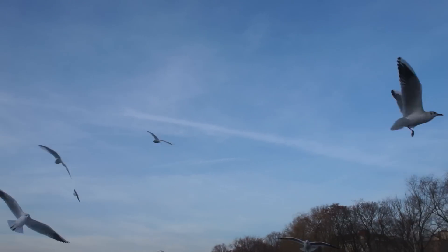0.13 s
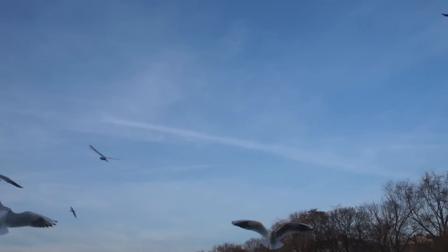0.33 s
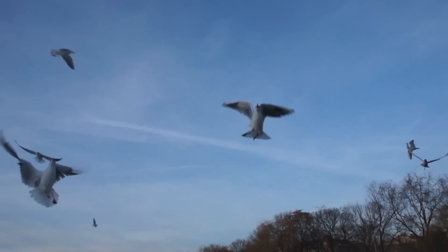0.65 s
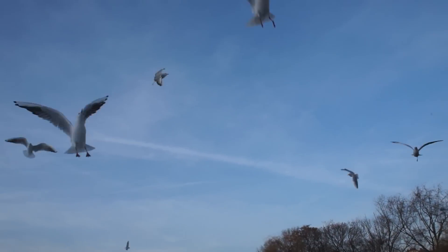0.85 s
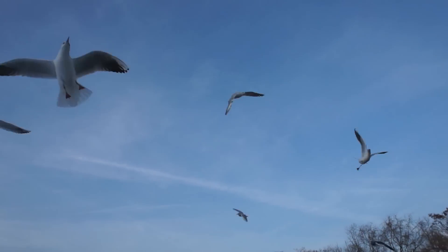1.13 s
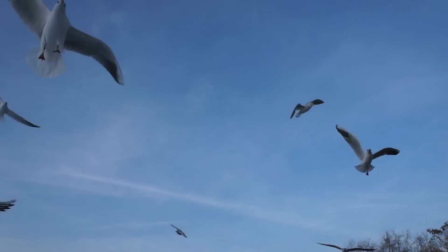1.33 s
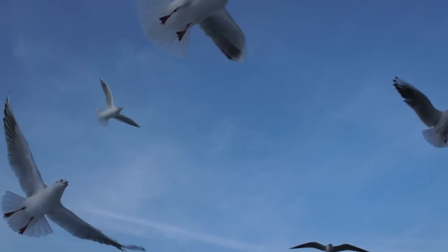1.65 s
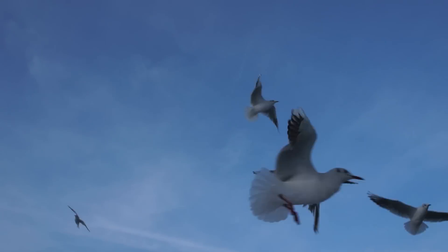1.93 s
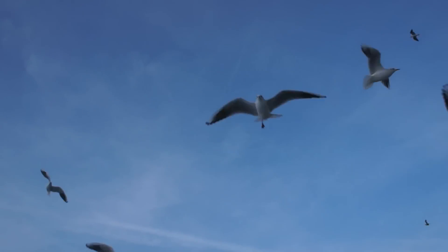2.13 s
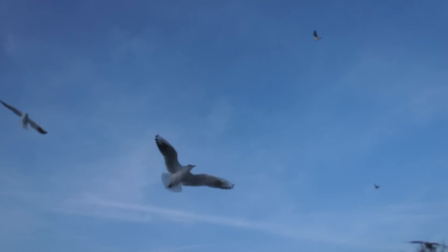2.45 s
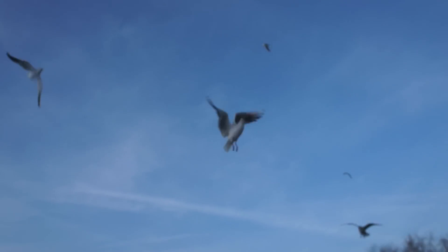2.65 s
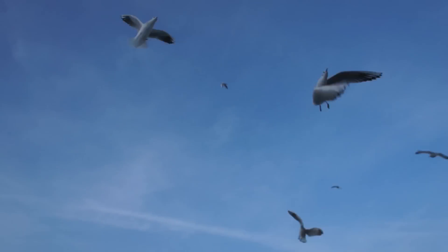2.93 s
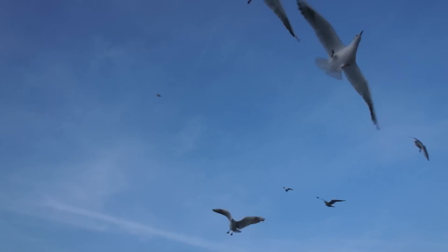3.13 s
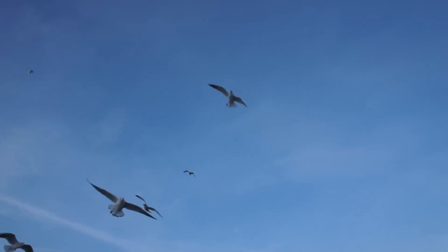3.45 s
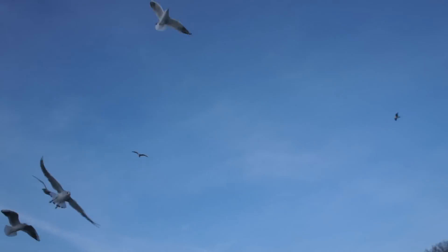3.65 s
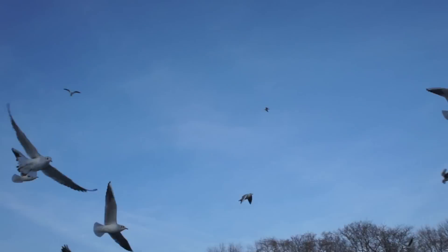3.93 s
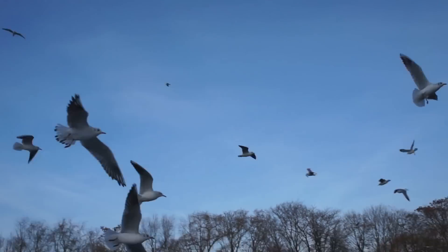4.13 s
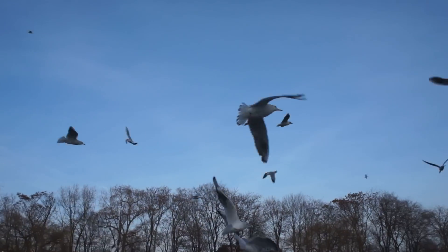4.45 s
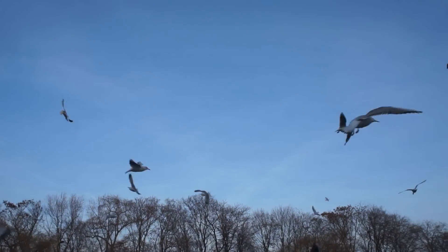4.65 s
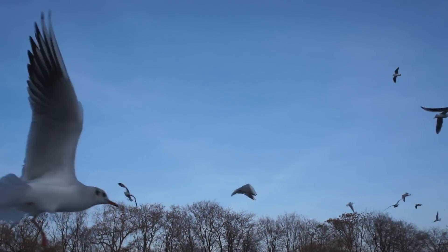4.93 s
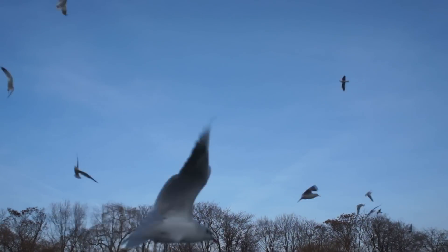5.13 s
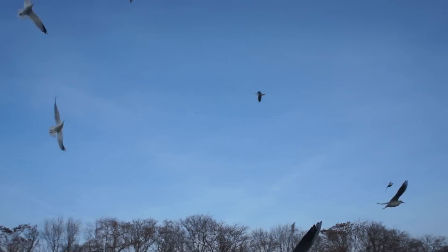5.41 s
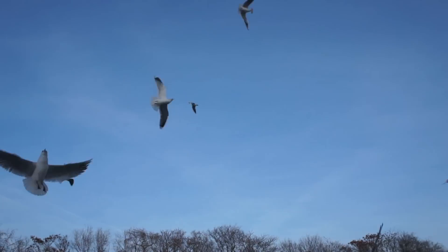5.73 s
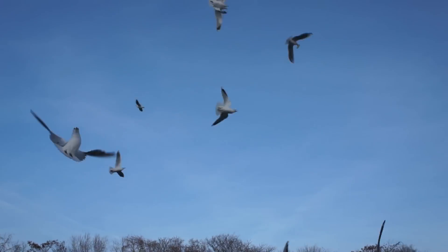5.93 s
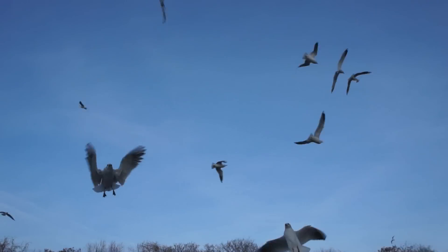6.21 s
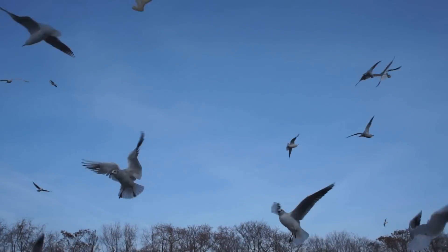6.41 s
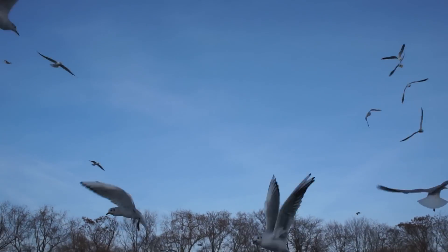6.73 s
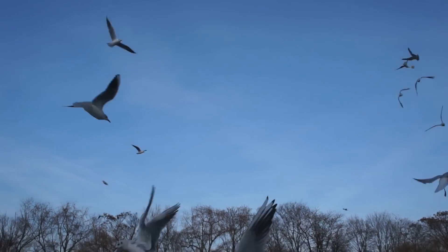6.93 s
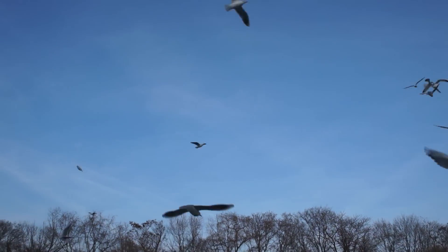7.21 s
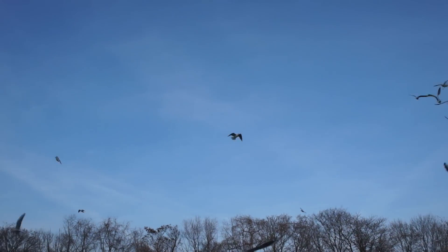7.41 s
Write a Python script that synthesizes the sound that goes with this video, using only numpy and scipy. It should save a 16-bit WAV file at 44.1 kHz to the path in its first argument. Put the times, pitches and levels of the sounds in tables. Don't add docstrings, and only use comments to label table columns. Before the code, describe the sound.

Harsh trilled gull squawks, clicks and a long wavering whistled cry, with wing swishes, distant flock murmur and wind buffeting at the end.

```python
import sys
import numpy as np
from scipy import signal
from scipy.fft import rfft, irfft, next_fast_len
from scipy.io import wavfile
from scipy.ndimage import uniform_filter1d, map_coordinates

SR = 44100
rng = np.random.default_rng(int(sys.argv[2]) if len(sys.argv) > 2 else 0)


def generate_wav(sig):
    pcm = np.round(np.clip(np.atleast_2d(sig).T, -1, 1) * 32767).astype(np.int16)
    wavfile.write(sys.argv[1], SR, pcm)


def attenuation_scalar(level_db):
    decades = np.asarray(level_db, float) / 20
    return 10 ** decades


N = 333837
PAD = 256

# start/s, end/s, top f/Hz, level/dB, bill opening/dB
RATTLES = [(.8445, .948, 973, -17, -2.5), (.9365, 1.021, 990, -19, -1)]
YAPS = [(1.178, 1.242, 816, -23.5, -11.5), (5.65, 5.7, 1157, -30.5, -1), (6.159, 6.244, 1060, -22, 1),
        (6.295, 6.355, 1242, -32, -0.5)]
RASPS = [(.137, .262, 984, -23, -5.5), (1.026, 1.054, 898, -38, -16), (4.587, 4.647, 785, -36, -51),
         (4.852, 4.915, 774, -33.5, -74), (6.412, 6.445, 839, -35, -20)]
LEAPS = [(1.248, 1.312, 988, -25.5, -10), (5.404, 5.497, 966, -30.5, -10)]
CLIMBS = [(1.4965, 1.592, 1174, -16.5, 3.8)]
KEKS = [(1.565, 1.609, 830, -21.5, -16), (1.853, 1.91, 1017, -27.5, -8.5), (2.594, 2.71, 993, -41.5, -21),
        (2.792, 2.851, 1021, -28, -15), (3.474, 3.514, 924, -33, -23), (4.352, 4.403, 1044, -28.5, -12)]
CROAKS = [(0.078, 0.16, 960, -41, -7), (1.484, 1.512, 1100, -32.5, -14), (1.296, 1.326, 760, -21, -12),
          (.357, .43, 900, -30, -8), (.379, .41, 840, -22.5, -0.5), (1.099, 1.166, 760, -40.5, -26),
          (4.15, 4.264, 989, -39, -8), (4.714, 4.779, 980, -36, -19), (5.599, 5.619, 810, -40, -20),
          (6.949, 7.015, 953, -36, -16.5)]
CACKLES = [(1.3205, 1.416, 894, -19.5, -3.3)]
SURGES = [(1.701, 1.776, 1013, -20, -3.8)]
# t/s, f/Hz, level/dB
PEEP = [(1.585, 3730, -23), (1.631, 3770, -21), (1.645, 3600, -23.5), (1.669, 3730, -20),
        (1.684, 3600, -24), (1.69, 3560, -27), (1.707, 3300, -31)]
MEW = [(3.937, 2990, -30), (3.972, 3390, -25.5), (4.02, 3480, -30.5), (4.068, 3410, -26.5),
       (4.1, 3060, -34.5), (4.13, 2847, -26), (4.185, 2860, -32)]
SQUEAL = [(5.37, 3790, -44), (5.42, 4260, -20.5), (5.53, 4033, -18), (5.548, 3790, -37), (5.59, 3430, -39),
          (5.6, 3680, -66)]
CRY_START = [(5.696, 3120, -20), (5.705, 3060, -16), (5.73, 3235, -19.5), (5.76, 3470, -28),
             (5.8, 3415, -31), (5.843, 3420, -25.5)]
CRY = [(5.835, 3430, -16.5), (5.855, 3135, -14), (5.947, 2946, -15), (5.959, 2980, -20)]
CRY_WAVER = [(5.957, 3010, -21), (5.969, 2895, -13.5), (5.999, 2970, -18.5), (6.037, 2910, -14),
             (6.055, 3003, -20.5), (6.075, 2888, -17), (6.111, 2870, -22), (6.147, 2895, -20.5),
             (6.172, 2840, -24)]
CRY_END = [(6.169, 2894, -18), (6.2, 2845, -26), (6.235, 2840, -31), (6.294, 2886, -20),
           (6.34, 2790, -26.5), (6.355, 2730, -38)]
WAIL = [(6.594, 3430, -26.5), (6.64, 3280, -34), (6.658, 3240, -35), (6.705, 3150, -26),
        (6.73, 3120, -23.5), (6.8, 2983, -25.5), (6.84, 3080, -23), (6.9, 2804, -30.5), (6.968, 2490, -31)]
ANSWER = [(6.885, 2960, -21), (6.901, 3017, -25), (6.959, 3110, -23), (6.979, 3119, -30),
          (6.997, 3030, -22), (7.055, 3054, -27.5), (7.081, 2870, -21), (7.157, 2905, -28.5),
          (7.176, 2870, -42)]
LAST_PEEP = [(7.485, 3500, -18.5), (7.5, 3630, -16), (7.55, 3750, -18), (7.568, 3660, -19)]


def unit(x):
    return x / np.sqrt(np.mean(x ** 2) + 1e-20)


def along(points, hz):
    f, v = np.transpose(points)
    return np.interp(np.log(hz + 1), np.log(f + 1), v)


def call(rows):
    s, *cols = np.transpose(rows)
    t = np.arange(round(s[0] * SR), round(s[-1] * SR) + 2) / SR
    return [t] + [np.interp(t, s, c) for c in cols]


def arch(start_s, end_s, start_hz, top_hz, end_hz, db, fullness):
    t = np.arange(round(start_s * SR), round(end_s * SR)) / SR
    u = (t - start_s) / (end_s - start_s)
    bulge_hz = top_hz - (start_hz + end_hz) / 2
    hz = start_hz + (end_hz - start_hz) * u + bulge_hz * 4 * u * (1 - u)
    return t, hz, attenuation_scalar(db) * np.abs(np.sin(np.pi * u)) ** fullness


def glide(start_s, end_s, start_hz, end_hz, db, fullness):
    return arch(start_s, end_s, start_hz, (start_hz + end_hz) / 2, end_hz, db, fullness)


def wobble(rate_hz, size=N):
    knots = rng.standard_normal(int(size * rate_hz / SR) + 4)
    return map_coordinates(knots, [np.arange(size) * rate_hz / SR])


def coloured(x, spectrum):
    size = next_fast_len(x.shape[-1] + 1024)
    gain = attenuation_scalar(along(spectrum, np.fft.rfftfreq(size, 1 / SR)))
    return irfft(rfft(x, size) * gain, size)[..., :x.shape[-1]]


def add(mix, x, start_s, pan_db=0, lag=0):
    x = np.pad(x * signal.windows.tukey(len(x), min(1, .006 * SR / len(x))), PAD)
    side = np.array([[.5], [-.5]])
    delay = np.exp(-2j * np.pi * np.fft.rfftfreq(len(x)) * lag * side)
    pair = irfft(rfft(x) * delay, len(x)) * attenuation_scalar(pan_db * side)
    room = mix[:, round(start_s * SR):][:, :len(x)]
    room += pair[:, :room.shape[1]]


def rush(spectrum, alike, patchy_db, lag=0):
    z = signal.stft(rng.standard_normal((3, N + 8)), nperseg=512)[2]
    patches = uniform_filter1d(rng.standard_normal(z.shape[1:]), 5, 0)
    patches = unit(uniform_filter1d(patches, 6, 1))
    shared, *own = signal.istft(z * attenuation_scalar(patchy_db * patches), nperseg=512)[1]
    common = np.array([shared[:N], shared[lag:N + lag]])
    pair = np.sqrt(alike) * common + np.sqrt(1 - alike) * np.array(own)[:, :N]
    return unit(coloured(pair, spectrum))


def air(birds):
    # t/s, port wind/dB, far flock/dB
    levels = [
        (0, -76, -40.5),
        (.6, -46, -40.5),
        (1, -68, -42),
        (2, -71, -42),
        (3.3, -71, -44),
        (5.3, -78, -45),
        (6.4, -61, -45),
        (6.75, -47, -49),
        (7.2, -42.5, -40),
        (7.57, -28, -43),
    ]
    # f/Hz, density/dB
    wind_spectrum = [(25, -24), (60, 4), (130, 0.5), (300, -1), (700, -31)]
    rumble_spectrum = [(50, -101), (150, -7), (280, 1), (600, -8.5), (1000, -41)]
    flock_spectrum = [(110, -4.5), (500, 0.5), (800, 1), (1700, -1.5), (2400, -8), (4500, -14.5),
                      (7000, -60)]
    hiss_spectrum = [(1500, 1), (3500, 3.5), (7000, 1.5), (10500, 0.5), (12200, -3), (13300, -24)]
    wind_db, flock_db = [c[:N] for c in call(levels)[1:]]
    busy = np.sqrt(np.abs(uniform_filter1d(np.mean(birds ** 2, axis=0), round(0.27 * SR))))
    busy = busy / busy.max()
    wind = rush(wind_spectrum, .7, patchy_db=2) * attenuation_scalar([[-3], [3]]) * [[1], [-1]]
    wind = wind * attenuation_scalar(wind_db + 9.0 + 0.58 * wobble(9.8))
    rumble_db = -45 - 3 * busy
    rumble = rush(rumble_spectrum, 0.91, patchy_db=3.5, lag=4) * attenuation_scalar(rumble_db + 3 * wobble(18))
    flock = rush(flock_spectrum, 0.77, patchy_db=4, lag=4) * attenuation_scalar(flock_db + 3.5 + 1.5 * wobble(12))
    hiss_gain = attenuation_scalar(-52 + 1.5 * busy) + attenuation_scalar(wind_db - 25)
    hiss = rush(hiss_spectrum, .15, patchy_db=1.5, lag=4) * hiss_gain * attenuation_scalar(7 + 2.4 * wobble(9))
    return wind + rumble + flock + hiss


def ground(x):
    t = np.arange(SR // 8) / SR
    tail = coloured(rng.standard_normal((2, len(t))), [(500, 4.5), (3000, -1), (9000, -8.5)])
    tail = tail * attenuation_scalar(-60 * t / 0.065)
    return signal.fftconvolve(x, tail / np.linalg.norm(tail[0]), axes=1)[:, :x.shape[1]]


def yelps(mix):
    # start/s, end/s, top f/Hz, level/dB
    hoots = [(3.035, 3.115, 1557, -48.5), (3.143, 3.236, 1650, -37.5), (3.264, 3.331, 1693, -37),
             (3.369, 3.475, 1736, -43.5), (3.501, 3.573, 1806, -40), (3.62, 3.702, 1680, -55),
             (4.121, 4.295, 1877, -45.5)]
    # start/s, end/s, start f/Hz, end f/Hz, level/dB
    slides = [(0, 0.052, 1333, 1354, -42), (0.738, 0.768, 1450, 1420, -41.5),
              (2.846, 2.971, 2090, 1784, -44), (3.784, 3.849, 1345, 1770, -48.5),
              (3.929, 4.046, 1496, 1970, -41), (4.4, 4.435, 1750, 1800, -47),
              (2.911, 2.992, 688, 893, -39.5), (2.997, 3.047, 572, 893, -45),
              (3.108, 3.145, 757, 766, -41.5), (3.215, 3.295, 698, 946, -38), (3.352, 3.389, 707, 975, -40),
              (4.497, 4.517, 860, 900, -43.5), (4.62, 4.678, 178, 212, -43.5),
              (1.802, 1.868, 434, 980, -42)]
    calls = [arch(a, b, 0.77 * hz, hz, 0.65 * hz, db, fullness=0.52) for a, b, hz, db in hoots]
    calls += [glide(*row, fullness=0.27) for row in slides]
    for t, hz, gain in calls:
        phase = 2 * np.pi * np.cumsum(hz * (1 + .035 * wobble(300, size=len(t)))) / SR
        tone = np.sin(phase) + attenuation_scalar(-18.0) * np.sin(2 * phase)
        tone = tone * attenuation_scalar(2.6 * wobble(156, size=len(t)))
        add(mix, unit(tone) * gain * attenuation_scalar(5.5), t[0], -1, 4)


def wings(mix):
    # t/s, peak/dB, centre f/Hz
    beats = [(0.346, -27, 236), (0.49, -24, 342), (1.126, -30, 398), (2.203, -24, 378), (2.344, -23, 285),
             (2.521, -33.5, 502), (2.692, -25.5, 343), (2.827, -29, 289), (2.985, -24.5, 537),
             (3.204, -29, 386), (3.568, -21, 356), (3.605, -23.5, 825), (3.778, -26.5, 236),
             (4.07, -30.5, 464), (4.325, -24, 367), (4.619, -24.5, 188), (4.872, -25.5, 797),
             (4.926, -25.5, 688), (4.988, -23.5, 754), (5.94, -31, 300), (5.963, -30.5, 290),
             (6.914, -17.5, 295), (7.079, -28, 243), (7.219, -28, 302), (7.375, -37, 310), (7.44, -22, 150),
             (7.498, -20, 233), (7.526, -41, 149)]
    # t/s, peak/dB
    swishes = [(0.2602, -16.5), (0.344, -22.5), (0.6734, -28), (1.0897, -20), (1.1476, -14),
               (2.6972, -20.5), (3.1014, -21), (3.147, -16.5), (3.205, -13.5), (3.245, -18.5), (3.654, -19),
               (4.498, -50), (4.556, -41), (4.69, -29), (4.847, -23.5), (4.9232, -24.5), (5.254, -31),
               (5.905, -41), (6.7864, -28), (7.1688, -20), (7.2068, -20), (7.328, -28), (7.3442, -15.5),
               (7.366, -24), (7.424, -36), (7.455, -18)]
    gusty_from_s = 6.9
    t = np.arange(SR // 16) / SR
    for s, db, hz in beats:
        push = np.sin(2 * np.pi * np.cumsum(hz * (1 + 0.19 * wobble(140.7, size=len(t)))) / SR)
        puff_spectrum = [(90, -30), (hz, 0), (1400, -8), (4000, -30)]
        puff = unit(coloured(rng.standard_normal(len(t)), puff_spectrum))
        shape = t / 0.0062 * np.exp(1 - t / 0.0092)
        gust = np.zeros_like(mix)
        add(gust, attenuation_scalar(db - 8.5) * shape * (push + 0.71 * puff), s - .003, rng.normal(-0.83, 0.35), 4)
        mix += gust * [[1], [-1 if s > gusty_from_s else 1]]
    feather_spectrum = [(150, -9), (500, -0.5), (1500, -4.0), (5000, -6), (12500, -12.5)]
    for s, db in swishes:
        hiss = unit(coloured(rng.standard_normal(len(t)), feather_spectrum))
        shape = (t / 0.0087 * np.exp(1 - t / 0.0091)) ** 2
        add(mix, attenuation_scalar(db - 14) * shape * hiss, s - .005, rng.normal(0, 0.57), rng.normal(3.18, 3.4))


def ticks(mix):
    # t/s, peak/dB, centre f/Hz
    clicks = [(0.837, -18, 2610), (0.843, -10, 2880), (1.419, -16.5, 1470), (1.4224, -21, 1360),
              (1.779, -12, 1980), (2.206, -34, 980), (2.351, -31, 1010), (2.926, -30, 1860),
              (4.501, -29, 923), (4.819, -34, 942), (4.877, -15, 1480), (5.373, -30, 1180),
              (5.805, -35, 1600), (5.904, -31, 1300), (5.947, -28, 1010), (5.966, -20, 1120),
              (6.423, -21, 1590), (6.435, -22, 1400)]
    decay_cycles = 2.8 / 2
    t = np.arange(SR // 100) / SR
    for s, db, hz in clicks:
        noise = coloured(rng.standard_normal(len(t)), [(300, -10), (1500, 6), (4500, 3), (8000, -20)])
        ring = (np.sin(2 * np.pi * hz * t) + .5 * noise) * np.exp(-t * hz / decay_cycles)
        add(mix, attenuation_scalar(db + 1.5) * np.roll(ring, 130), s - .003, -1, 4)


def whistles(mix):
    # (octave/dB and third partial/dB re first, left minus right/dB, left lag/samples, quaver/Hz)
    voices = [(PEEP, (-13, -22.5, -1, 7.5, -1)), (MEW, (-9.5, -15.5, -5, 8.5, 0)),
              (SQUEAL, (-19.5, -28, 3, 3.5, 0.5)), (CRY_START, (-1.5, -22, 4, -2, -2)),
              (CRY, (-7.5, -28, -1.5, 1, 1.5)), (CRY_WAVER, (-10, -44, -6.5, 1.5, 2.5)),
              (CRY_END, (-10, -43, -8, 1.5, 1.5)), (WAIL, (-9, -64, -5.5, 4, 20)),
              (ANSWER, (-12.5, -64, -4, 4, 15)), (LAST_PEEP, (-9.5, -23.5, 2, 7, -6.5))]
    # start/s, end/s, start f/Hz,
    # end f/Hz, level/dB
    piping = [(4.188, 4.241, 2780, 2930, -33), (6.62, 6.65, 2300, 2170, -35.5),
              (6.843, 6.883, 2050, 2440, -28.5), (7.095, 7.178, 4360, 4020, -33),
              (7.155, 7.199, 2340, 2380, -27.5), (7.466, 7.506, 4280, 4500, -23.5),
              (7.512, 7.569, 2870, 2980, -25), (4.122, 4.226, 3160, 3500, -33.5),
              (3.915, 3.95, 4250, 4650, -37), (4.11, 4.17, 4500, 4200, -37), (6.36, 6.43, 2850, 2950, -40),
              (6.298, 6.352, 2090, 2650, -17)]
    for rows, (under_db, third_db, pan_db, lag, quaver_hz) in voices:
        t, hz, db = call(rows)
        quaver = np.cos(2 * np.pi * quaver_hz * (t - t[0]))
        quaver = quaver - quaver.mean()
        hz = hz * (1 + .008 * quaver)
        db = db - 1.7 * quaver
        octave_db = db + under_db + 0.62 * (db - db.max())
        phase = 2 * np.pi * np.cumsum(hz * (1 + .007 * wobble(55, size=len(t)))) / SR
        flutter = attenuation_scalar(.8 * wobble(90, size=len(t)))
        tone = attenuation_scalar(db) * np.sin(phase)
        tone += attenuation_scalar(octave_db) * flutter * np.sin(2 * phase)
        tone += attenuation_scalar(db + third_db) * np.sin(3 * phase)
        add(mix, np.sqrt(2) * flutter * tone, t[0], pan_db, lag)
    for row in piping:
        t, hz, gain = glide(*row, fullness=0.46)
        phase = 2 * np.pi * np.cumsum(hz * (1 + 0.017 * wobble(147, size=len(t)))) / SR
        octave_db = -6 + 1.1 * (row[-1] + 19)
        tone = np.sin(phase) + attenuation_scalar(octave_db) * np.sin(2 * phase)
        add(mix, gain * tone * attenuation_scalar(1.5 + 1.4 * wobble(66, size=len(t))), t[0], -3, 4)


def split_voice(mix):
    # t/s, f/Hz, level/dB
    second_voice = [(5.732, 4370, -27), (5.755, 4700, -31), (5.79, 4820, -18), (5.825, 4796, -18),
                    (5.842, 4600, -26)]
    # t/s, level/dB re first partial
    doubling = [(5.85, -32), (5.96, -27), (6.0, -17), (6.15, -6), (6.3, -9.5)]
    long_cry = [*CRY_START[:-1], *CRY, *CRY_WAVER[1:], *CRY_END[1:]]
    s, hz, first_db = np.transpose(long_cry)

    def first_phase(t):
        return 2 * np.pi * np.cumsum(np.interp(t, s, hz)) / SR

    t, second_hz, db = call(second_voice)
    a = first_phase(t)
    b = 2 * np.pi * np.cumsum(second_hz * (1 + 0.0066 * wobble(110, size=len(t)))) / SR
    mixed = np.sin(b) + attenuation_scalar(-16.0) * np.sin(a + b)
    mixed += attenuation_scalar(-18.0) * np.sin(2 * b - a) + attenuation_scalar(-41) * np.sin(2 * a - b)
    add(mix, np.sqrt(2) * attenuation_scalar(db + 2.2 * wobble(139, size=len(t))) * mixed, t[0], 2.8, -2)

    t, db = call(doubling)
    half = first_phase(t) / 2
    lines = np.sin(3 * half) + attenuation_scalar(-11.0) * np.sin(half) + attenuation_scalar(-17) * np.sin(5 * half)
    spells_db = 4 * wobble(50, size=len(t)) + 6 * np.cos(2 * np.pi * 31 * t)
    add(mix, attenuation_scalar(np.interp(t, s, first_db) + db - 3 + spells_db) * lines, t[0], -3.6, -1)


def squawks(mix):
    # (start and end pitch re top, trill/Hz)
    kinds = [(RATTLES, (.93, 0.73, 87)), (YAPS, (.86, .93, 99)), (RASPS, (.97, 0.81, 61)),
             (LEAPS, (0.71, 0.75, 101)), (CLIMBS, (0.86, 1.0, 130)), (KEKS, (0.84, 0.75, 124)),
             (CROAKS, (.91, 1.05, 110)), (CACKLES, (.93, .85, 97)), (SURGES, (.48, 1.2, 95))]
    trill_depth = (.85, .85, .85, .75, .97, .7, .5, .97, .95)
    hoarse = (.2, .22, .33, .18, .24, .15, .4, .14, .26)
    # f/Hz, gain/dB
    throat_shut = [(400, -32.5), (1230, -7.5), (1800, -3), (3000, -0.5), (4200, 0.5), (5200, 0.5),
                   (6800, -4.5), (9800, -22.5)]
    # t/s, left minus right/dB, left lag/samples
    bearing = [(.12, 1.5, 3.5), (.36, 1.5, 4), (0.897, -8, 4.5), (1.18, 2.5, -4), (1.262, -3, 3.5),
               (4.15, -1.5, 7), (4.35, 2.5, 5), (4.9, 4, 13.5), (5.4, 3.5, -5), (6.16, -3, 3),
               (6.45, 6.5, 5.5)]
    swell_s = 0.025
    k = np.arange(1, 15)[:, None]
    s, *place = np.transpose(bearing)
    calls = []
    for (rows, manner), depth, rough in zip(kinds, trill_depth, hoarse):
        calls += [(*row, *manner, depth, rough) for row in rows]
    for start_s, end_s, top_hz, db, bill_db, rise, fall, trill_hz, depth, rough in calls:
        pan_db, lag = [np.interp(start_s, s, c) for c in place]
        fullness = min(1, swell_s / (end_s - start_s))
        t, hz, gain = arch(start_s, end_s, rise * top_hz, top_hz, fall * top_hz, db, fullness)
        size = len(t)
        gain = gain * (hz / top_hz) ** 2.1
        effort = gain / gain.max()

        turn = np.cumsum(trill_hz * (1 + .05 * wobble(62, size))) / SR % 1
        opening = np.clip(1.35 * np.sin(np.pi * turn ** .85) ** 1.6, 0, 1)
        gate = 1 - depth * (1 - opening)
        shaky = .04 + .33 * (1 - effort) ** 2 + .12 * np.clip(wobble(45, size), 0, 2) ** 2
        bend = 1 + .1 * depth * (turn - .5) + shaky * rough * wobble(600, size)
        phase = 2 * np.pi * np.cumsum(hz * bend) / SR

        throat = [(f, g + bill_db * np.clip((f - 2000) / 2600, 0, 1.3)) for f, g in throat_shut]
        shifting_db = 2.0 * np.array([wobble(40.8, size) for _ in k])
        partials = attenuation_scalar(along(throat, k * hz) + shifting_db) * np.cos(k * phase - 0.14 * k)
        pulses = -np.sum(partials, axis=0)
        unsteady = attenuation_scalar(1.5 * wobble(80, size) + 2.2 * wobble(500, size))
        breath = coloured(rng.standard_normal(size) * (1 + np.cos(phase)), throat)
        voice = np.sqrt(1 - rough) * unit(pulses) * unsteady + np.sqrt(rough) * unit(breath)

        dull = coloured(voice, [(2200, 1), (4200, -5), (6000, -16), (9000, -30)])
        voice = dull + effort ** .9 * (voice - dull)
        add(mix, unit(voice * gate) * gain * attenuation_scalar(6.5), t[0], pan_db, lag)


def scene():
    rough, clear = np.zeros((2, 2, N + PAD))
    yelps(rough)
    wings(rough)
    ticks(rough)
    whistles(clear)
    split_voice(clear)
    squawks(rough)
    birds = rough + clear + attenuation_scalar(-18) * ground(rough) + attenuation_scalar(-20) * ground(clear)
    birds = birds[:, PAD:]
    return birds + air(birds)


def band_limit(x):
    return signal.sosfilt(signal.butter(12, 13360, fs=SR, output="sos"), x)


def record(dry):
    rounded = dry / (1 + np.abs(dry / .72) ** 5) ** .2
    soft = dry + coloured(rounded - dry, [(200, -40), (600, 0)])
    mix = coloured(soft, [(25, -17.0), (140, 0.5), (11500, 2), (12600, -10.5), (13500, -41)])
    return band_limit(mix)


dry = scene()
out = record(dry)
generate_wav(out)
```